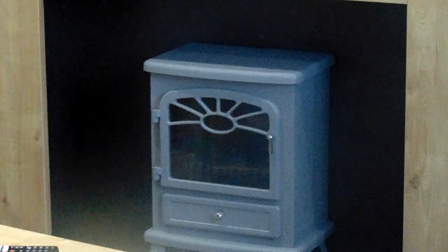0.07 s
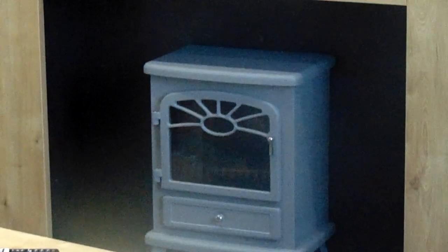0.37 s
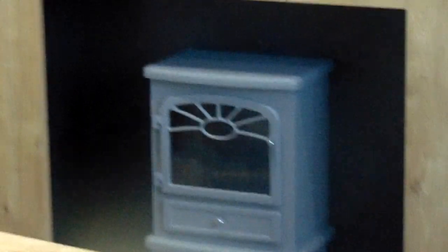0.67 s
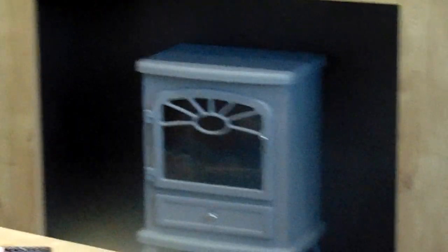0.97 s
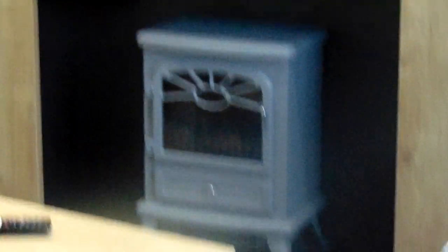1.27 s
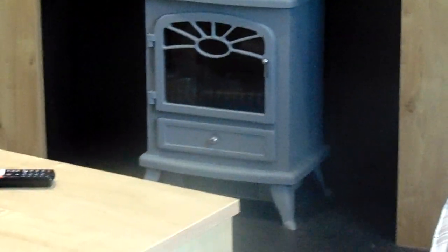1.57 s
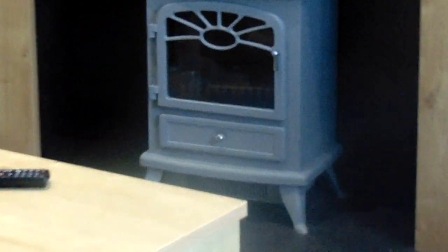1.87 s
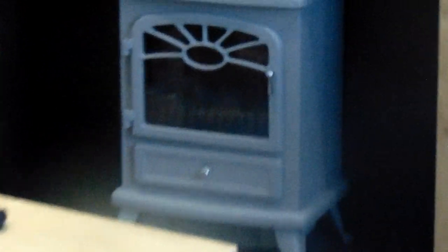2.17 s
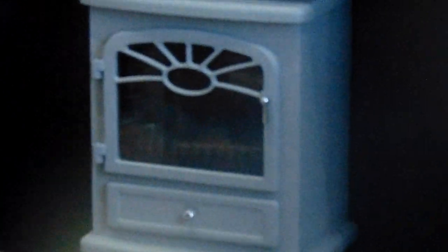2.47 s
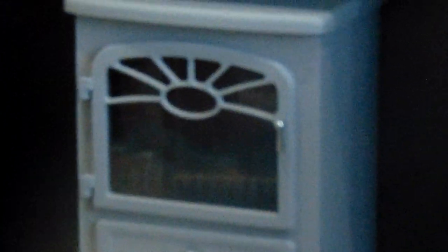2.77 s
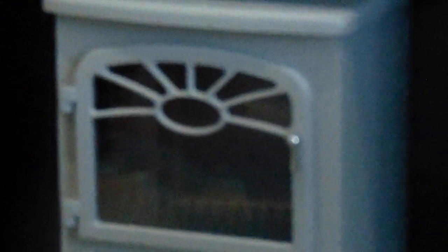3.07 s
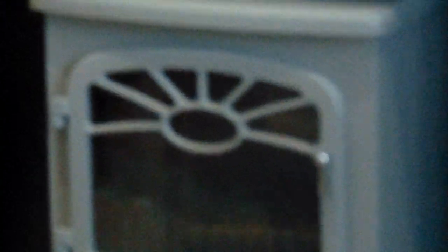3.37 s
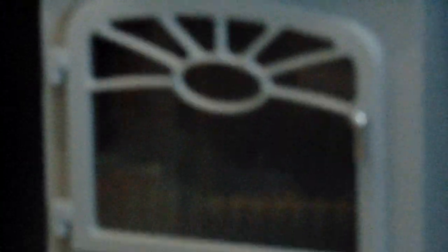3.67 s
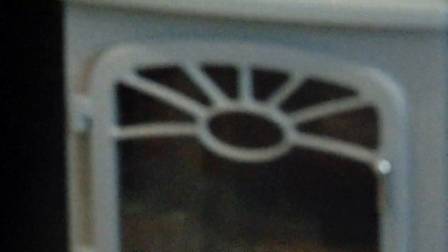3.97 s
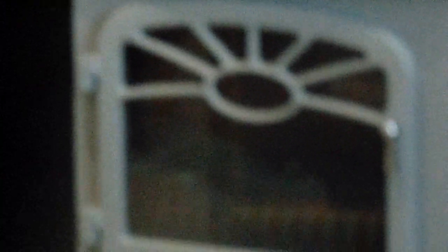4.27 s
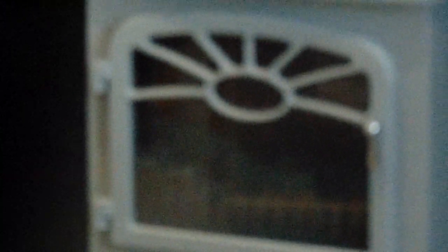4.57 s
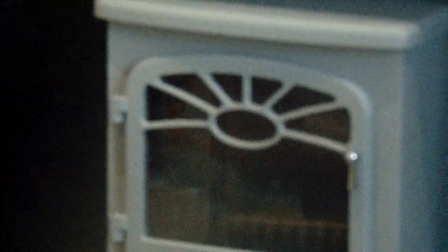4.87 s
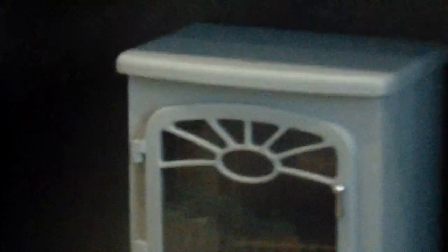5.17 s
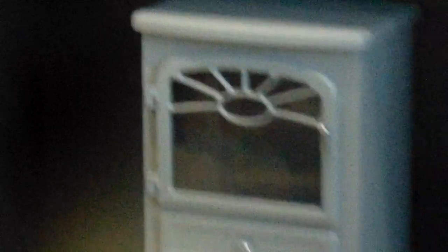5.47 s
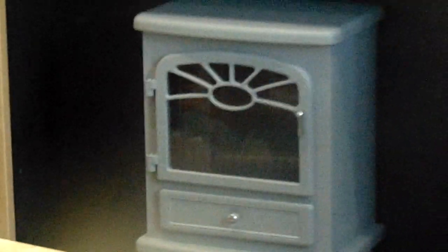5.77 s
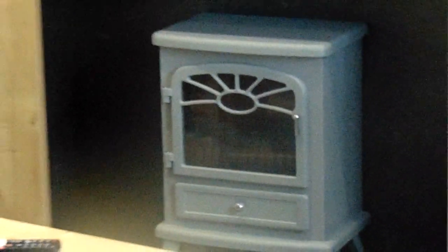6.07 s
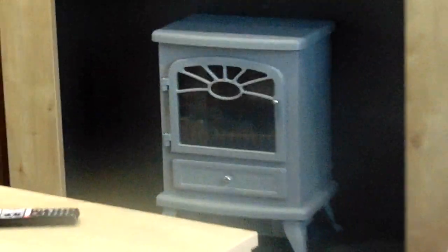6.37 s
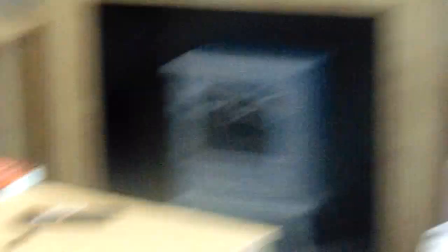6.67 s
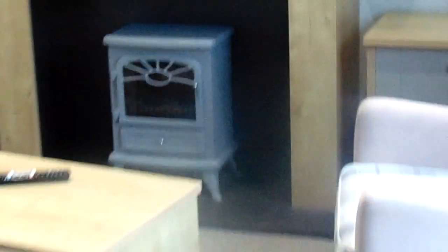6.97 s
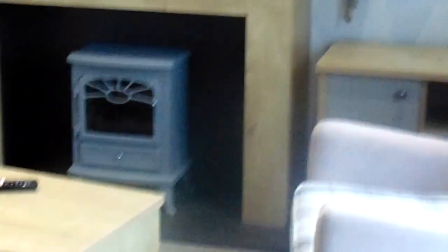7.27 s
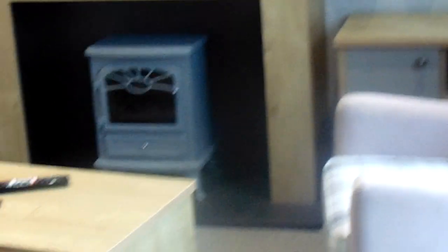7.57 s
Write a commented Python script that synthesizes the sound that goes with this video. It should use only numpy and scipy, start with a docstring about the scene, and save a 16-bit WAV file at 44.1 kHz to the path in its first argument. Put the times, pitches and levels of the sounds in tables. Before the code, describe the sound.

A small camera zoom motor whirrs faintly in and out with soft ticks, plastic handling clicks and one loud snap in a quiet room.

```python
"""A hand-held camera in a quiet room, heard through its own body.
The microphone comes on with mains hum and hiss, and fingers click the lever and the case.
The geared zoom motor whirrs in while the focus drive ticks softly, until one hard snap
of the lever overloads the microphone. The motor restarts with a brief scrape and whirrs back out
with more focus ticks, and near the end the fingers click, rub and squeak on the plastic."""
import sys
import numpy as np
from scipy import signal
from scipy.fft import rfft, irfft
from scipy.io import wavfile

SR = 44100
rng = np.random.default_rng(int(sys.argv[2]) if len(sys.argv) > 2 else 0)


def put_to_file(sound):
    """Save the sound as 16-bit audio at rate SR, in the file named by the first command-line argument."""
    columns = np.atleast_2d(sound).T  # one column per channel
    safe = np.clip(columns, -1, 1)
    whole_steps = np.round(safe * 32767)
    wavfile.write(sys.argv[1], SR, whole_steps.astype(np.int16))


N = 340011
TIME = np.arange(N) / SR

# How the motor runs, zooming in and then out: time_s, level_db, turns_per_s
MOTOR_IN = [(1.82, -72, 140), (1.88, -55.5, 140), (1.93, -50, 158.5), (2.3, -51.5, 162),
            (2.8, -51.5, 164.5), (3.2, -52, 159), (3.55, -53.5, 159.5), (3.81, -57.5, 153),
            (3.85, -79, 160)]
MOTOR_OUT = [(4.39, -74, 150.7), (4.46, -55.5, 158.8), (4.6, -59, 161.3), (5.25, -56.5, 160.8),
             (6.55, -55.5, 159.7), (6.95, -52.5, 156.7), (7.2, -57, 159.3), (7.46, -73, 151)]
# Pitches the lens barrel brings out of the gear noise: pitch_hz, width_hz, zoom_in_db, zoom_out_db
BARREL_BANDS = [(324, 190, -1, 0.5), (568.5, 91, -4.5, 2), (827, 89, -5, -5), (1200, 180, -0.5, 2),
                (1650, 220, -2, -1.5), (2136, 100, 0.5, 1), (2330, 100, -2, 1.5), (2646, 84, 1, 0),
                (2794, 120, -5, -0.5), (3078, 108.3, -5.5, -19), (3300, 150, -18.5, -3.5),
                (3745, 240, 4, -3), (5800, 1300, -10, -9.5), (7595, 230, -2, -4), (8095, 300, 0, -5),
                (9380, 510, -10, -5), (11000, 250, -14, -10), (12300, 780, -13, -11.5)]

def zoom_motor(run, bands_db, throb, grit_db, floor_db):
    """Gear teeth rub in bursts, once each motor turn, and the hollow barrel colours the noise."""
    time_s, level_db, speed = np.transpose(run)
    turns = np.cumsum(np.interp(TIME, time_s, speed) * (1 + 0.017 * drift(25))) / SR
    roughness = gain_of(.6 * drift(35) + grit_db * drift(500))
    bursts = 1 + throb * np.cos(2 * np.pi * turns)
    teeth = bursts * roughness * rng.standard_normal(N)
    hz = np.fft.rfftfreq(N, 1 / SR)
    power = gain_of(floor_db) ** 2 / (1 + (hz / 9000) ** 2)  # fills in between the bands
    for (pitch_hz, width_hz, *_), band_db in zip(BARREL_BANDS, bands_db):
        power += gain_of(band_db) ** 2 * np.exp(-((hz - pitch_hz) / width_hz) ** 2)
    whirr = irfft(rfft(teeth) * np.sqrt(power), N)
    return level(time_s, level_db) * unit_rms(whirr)


# Gear notes, with levels relative to the motor: cycles_per_turn, width_hz, zoom_in_db, zoom_out_db
GEAR_NOTES = [(14.23, 60, -9, -12.5), (17.02, 83, -23.5, -10.5), (58.83, 320, -6, -21)]

def gear_whine(run, notes_db, growth_db_per_s):
    """Each pair of gears sings at a multiple of the motor's speed and follows its level."""
    time_s, level_db, speed = np.transpose(run)
    turns_per_s = np.interp(TIME, time_s, speed)
    notes = sum(gain_of(db) * whine(multiple * turns_per_s, width_hz)
                for (multiple, width_hz, *_), db in zip(GEAR_NOTES, notes_db))
    return level(time_s, level_db + growth_db_per_s * (time_s - time_s[0])) * notes


# Notes of the carriage that holds the lens: pitch_hz, level_db, ring_s (time to fade by 60 dB)
CARRIAGE_NOTES = [(380, -31, 0.019), (576, 4.5, 0.034), (709, 3.5, 0.021), (834, -2, 0.034),
                  (1265, -3.5, 0.019), (1700, -7, 0.016)]
# Runs of even steps, before boost_db: start_s, step_count, gap_s, first_db, last_db
FOCUS_STEPS = [(1.954, 24, .0319, -45, -42), (2.738, 9, 0.041, -41, -42.5), (3.125, 6, .0642, -40, -42.5),
               (5.313, 11, .0423, -52, -45.5), (5.93, 5, .0423, -52.5, -46)]
# The carriage jolts as it takes up slack, before boost_db: start_s, strength_db
FOCUS_JOLTS = [(1.841, -40.5), (3.707, -43.5), (3.919, -45.5), (4.272, -46.5), (4.333, -44), (4.419, -41.5),
               (4.516, -43), (4.673, -45), (4.855, -44), (5.603, -41.5), (5.738, -48.5), (7.572, -43)]

def focus_drive(boost_db=4, uneven_db=0.8):
    """The focus lens moves in steps; each step or jolt softly knocks its carriage."""
    out, t = np.zeros(N), np.arange(3000) / SR
    for start_s, step_count, gap_s, first_db, last_db in FOCUS_STEPS:
        for k, db in enumerate(np.linspace(first_db, last_db, round(step_count))):
            knock = ring(CARRIAGE_NOTES, t, rise_cycles=1.1, scatter=.025)
            step_db = db + boost_db + uneven_db * rng.standard_normal()
            add(out, start_s + k * gap_s, gain_of(step_db) * knock)
    jolt_tone_db = favour(CARRIAGE_NOTES, pitch_hz=870, octave_drop_db=15)
    for start_s, db in FOCUS_JOLTS:
        knock = ring(CARRIAGE_NOTES, t, rise_cycles=1.1, scatter=.025, weight_db=jolt_tone_db)
        add(out, start_s, gain_of(db + boost_db) * knock)
    return out


SNAP_S = 3.6303
# Notes of the struck lever: pitch_hz, level_db, ring_s
LEVER_NOTES = [(1415, -8.5, 0.019), (2777, 1, .019), (3027, -6.5, 0.015), (3379, -10.5, .018),
               (3717, -12, 0.028), (4570, -12.5, .015), (5370, -14.5, .016), (7550, -12.5, 0.013)]

def lever_snap(snap_db=2, ring_db=8.5, bounce_s=.0034, bounce_shrink=.55, bounce_loss_db=1.5):
    """The lever slips off its catch, rings, and bounces on its stop, sooner and weaker each time."""
    out, hit_s = np.zeros(N), SNAP_S
    contact = dict(pitch_hz=2100, crack_db=0.5, thud_db=-31.5)
    add(out, hit_s - .0011, strike(snap_db - 11, **contact))  # the catch lets go
    add(out, hit_s, gain_of(ring_db) * ring(LEVER_NOTES, np.arange(4096) / SR, rise_cycles=2.36))
    for k in range(3):
        add(out, hit_s, strike(snap_db - k * bounce_loss_db, **contact))
        hit_s += bounce_s * bounce_shrink ** k
    return out


# Plastic parts click twice: start_s, level_db, pitch_hz, crack_db, gap_s, second_change_db
DOUBLE_CLICKS = [(1.1571, -35.5, 2600, -11, 0.0077, 7.5), (1.182, -28, 2200, -14, 0.0037, -5),
                 (1.1889, -16.5, 1620, -7, .0028, -2.5), (1.2055, -31, 1750, -7, 0.00335, 10.5),
                 (1.318, -20, 2150, -19.5, 0.0088, -3.5), (1.4288, -33.5, 2780, -15, 0.016, 5.5),
                 (3.856, -28, 2380, -10, 0.00103, -9), (6.6487, -18, 3540, -4, 0.0018, -1.5),
                 (6.658, -15, 2260, 5, .009, -17), (6.802, -27, 3220, 3.5, .0076, 8)]
# Fingertip knocks, and two sharper ticks of the focus drive at 5.6 and 5.74 s:
# start_s, level_db, pitch_hz, crack_db
CASE_KNOCKS = [(.289, -42, 2480, -20), (1.102, -38.5, 995, -9), (1.8367, -36, 4900, -10),
               (3.4976, -31.5, 1520, -0.5), (4.517, -37, 1292, -17), (5.6021, -38.5, 1700, 2),
               (5.7361, -39.5, 1290, -15), (6.6596, -20.5, 1370, 9.5), (6.731, -35.5, 1680, -8),
               (6.753, -27, 1660, 8.5), (6.774, -29.5, 1350, -1), (6.782, -31, 3250, -6)]
# The case creaks in faint ticks as the grip shifts: start_s, level_db
GRIP_CREAKS = [(6.828, -36), (6.858, -39), (6.994, -42), (7.082, -42), (7.43, -44), (7.516, -43)]

def clicks(click_thud_db=-42, knock_thud_db=-16.5):
    """Small hits ring the case; hard clicks barely push the microphone, knocks push it more."""
    out = np.zeros(N)
    for start_s, db, pitch_hz, crack_db, gap_s, second_change_db in DOUBLE_CLICKS:
        add(out, start_s, strike(db, pitch_hz, crack_db, click_thud_db))
        add(out, start_s + gap_s, strike(db + second_change_db, pitch_hz, crack_db, click_thud_db))
    for start_s, db, pitch_hz, crack_db in CASE_KNOCKS:
        add(out, start_s, strike(db, pitch_hz, crack_db, knock_thud_db))
    for start_s, db in GRIP_CREAKS:
        add(out, start_s, strike(db, pitch_hz=2660, crack_db=-14, thud_db=click_thud_db))
    return out


# Notes of the plastic case: pitch_hz, level_db, ring_s
CASE_NOTES = [(775, -1, 0.021), (910, -7.5, 0.013), (1184, 0.5, 0.019), (1462, 0, 0.016), (1729, 1.5, .015),
              (1906, -7.5, 0.011), (2052, 0, 0.016), (2217, -3.5, .014), (2435, -3, 0.012),
              (2802, 3, 0.0087), (2968, 3, 0.014), (3515, -6, 0.0083), (3938, -8, 0.0073),
              (3960, -5, 0.01605), (4720, -10.5, 0.014), (5456, -9, .009)]
# Tone of a hit's bright crack and of its low rumble: pitch_hz, level_db
CRACK_TONE = [(300, -9.5), (1000, -2), (4200, 5), (6000, -8), (8000, -1.5), (10000, -1.5), (12700, 4),
              (14500, -3)]
RUMBLE_TONE = [(60, -9.5), (160, 1.5), (450, -4), (900, -1), (1500, -22), (5000, -51)]

def strike(level_db, pitch_hz, crack_db, thud_db, push_s=0.0012):
    """One hit rings the case; a crack and a thud on the microphone are set relative to that ring."""
    t = np.arange(4096) / SR
    # where and how hard the hit lands brings out the notes near one pitch
    tone_db = favour(CASE_NOTES, pitch_hz, octave_drop_db=12)
    body = ring(CASE_NOTES, t, rise_cycles=1.2, scatter=.012, weight_db=tone_db)
    crack = 0.84 * noise(CRACK_TONE, len(t)) * (1 - np.exp(-t / 0.00026)) * np.exp(-t / 0.0012)
    push = -t / push_s * np.exp(1 - t / push_s)
    rumble = noise(RUMBLE_TONE, len(t)) * (1 - np.exp(-t / 0.00038)) * np.exp(-t / 0.0075)
    thud = push + gain_of(-7) * rumble
    return gain_of(level_db) * (body + gain_of(crack_db) * crack + gain_of(thud_db) * thud)


# Notes of the spring and of a button's metal dome: pitch_hz, level_db, ring_s
SPRING_NOTES = [(1326, -7.5, 0.12), (1933, 4, .09), (2406, -10.5, 0.125), (2620, -8.5, 0.083),
                (3895, -20.5, .45), (5260, -21, 0.093)]
DOME_NOTES = [(3960, 0, 0.019)]

def springs(spring_db=-18.5, dome_s=1.208, dome_db=-25):
    """A spring rings on after the lever's snap; earlier, a button's dome pings as it pops back."""
    out, t = np.zeros(N), np.arange(16384) / SR
    add(out, SNAP_S, gain_of(spring_db) * ring(SPRING_NOTES, t, rise_cycles=3))
    add(out, dome_s, gain_of(dome_db) * ring(DOME_NOTES, t, rise_cycles=2))
    return out


# A brief scrape as the zoom motor starts again, then finger rubs: start_s, length_s, level_db
RUB_STROKES = [(4.442, 0.064, -53.5), (6.761, 0.033, -41), (6.877, 0.025, -44), (7.072, .25, -50),
               (7.251, 0.25, -50), (7.315, 0.022, -52)]
# Tone of the rubbing: pitch_hz, level_db
RUB_TONE = [(200, -3), (1200, 0), (3000, -1), (5000, -6), (9000, -6), (12000, -6), (13700, -2), (15000, 0)]
# One finger rub squeaks, rising in pitch: time_s, pitch_hz, level_db
FINGER_SQUEAK = [(7.14, 1810, -69), (7.2, 1890, -57), (7.3, 2500, -63), (7.34, 3060, -67),
                 (7.39, 3100, -78)]

def rubbing():
    """The restarting motor scrapes; later a finger drags on the case in fine slips and squeaks once."""
    strokes = np.zeros(N)
    for start_s, length_s, db in RUB_STROKES:
        progress = np.clip((TIME - start_s) / length_s, 0, 1)
        strokes += gain_of(db) * abs(np.sin(np.pi * progress)) ** 0.94  # swells, then fades
    slips = unit_rms(noise(RUB_TONE) * gain_of(1.8 * drift(370)))
    time_s, pitch_hz, level_db = np.transpose(FINGER_SQUEAK)
    squeak = level(time_s, level_db) * whine(np.interp(TIME, time_s, pitch_hz), width_hz=200)
    return strokes * slips + squeak


# Tone of the echo: pitch_hz, level_db
ECHO_TONE = [(100, 1), (1000, -2), (3000, -4), (5500, 6.0), (14000, -0.5)]

def room_echo(sound, ring_s=0.15, echo_db=-33):
    """The furnished room sends back a faint, short echo."""
    t = np.arange(16384) / SR
    tail = noise(ECHO_TONE, len(t)) * gain_of(-60 * t / ring_s) * (t > .006)
    return gain_of(echo_db) * signal.fftconvolve(sound, tail / np.linalg.norm(tail))[:N]


# How loud the room air and the hiss are: time_s, air_db, hiss_db
BACKGROUND_LEVELS = [(0, -56.5, -57.5), (.7, -58, -56), (3.6, -59, -54), (3.75, -58, -61),
                     (4.4, -60.5, -61), (7.35, -57, -63), (7.55, -55.5, -58), (7.75, -54, -58.5)]
# Tone of the air and of the hiss: pitch_hz, level_db
AIR_TONE = [(15, 5), (40, -3.5), (80, 2.5), (160, -2.5), (320, -2.5), (600, -5.5), (1200, -8.5),
            (2000, -14), (4000, -21.5), (9000, -40)]
HISS_TONE = [(100, 2.5), (2000, 3), (4000, 0.5), (8000, -1), (14000, -3)]

def background(switch_on_s=0.07, hum_hz=99.7, hum_db=-58.5):
    """The microphone comes on and settles, with room air, wavering mains hum and its own hiss."""
    time_s, air_db, hiss_db = np.transpose(BACKGROUND_LEVELS)
    hum = np.sqrt(2) * np.sin(2 * np.pi * hum_hz * TIME + .12 * drift(3))
    hum *= gain_of(hum_db + 0.94 * drift(6.5))
    air = level(time_s, air_db) * noise(AIR_TONE)
    hiss = level(time_s, hiss_db) * noise(HISS_TONE)
    settling = -0.0069 * np.exp(-abs(TIME - switch_on_s) / 0.098)
    return (TIME > switch_on_s) * (air + hiss + hum + settling)


def ring(notes, t, rise_cycles, scatter=0, weight_db=0):
    """A struck part's notes swell, low ones more slowly, and fade; scatter detunes each hit a bit."""
    hz, db, ring_s = np.transpose(notes)[:, :, None]
    detune, phase = rng.uniform(-1.17, 1, (2, len(notes), 1))
    swell = 1 - np.exp(-(t * hz / rise_cycles) ** 2)
    waves = np.sin(2 * np.pi * hz * (1 + scatter * detune) * t + np.pi * phase)
    sound = (gain_of(db + weight_db - 60 * t / ring_s) * swell * waves).sum(0)
    return sound / np.sqrt(np.sum(sound ** 2) / (.0005 * SR))  # same energy for every ring


def favour(notes, pitch_hz, octave_drop_db):
    """Decibels that turn each note down the further it lies from one pitch."""
    return -octave_drop_db * np.log2(np.array(notes)[:, :1] / pitch_hz) ** 2


def whine(pitch_hz, width_hz):
    """A tone that follows a pitch curve, made hoarse by uneven contact."""
    angle = 2 * np.pi * np.cumsum(pitch_hz) / SR
    smear = np.exp(-(np.fft.rfftfreq(N, 1 / SR) / width_hz) ** 2 / 2)
    cos_part, sin_part = irfft(rfft(rng.standard_normal((2, N))) * smear, N)
    return unit_rms(cos_part * np.cos(angle) + sin_part * np.sin(angle))


def noise(tone, size=N):
    """Noise shaped by a table of pitch_hz, level_db."""
    hz, db = np.transpose(tone)
    shape_db = np.interp(np.log(np.fft.rfftfreq(size, 1 / SR) + 1), np.log(hz), db)
    return unit_rms(irfft(rfft(rng.standard_normal(size)) * gain_of(shape_db), size))


def drift(changes_per_s):
    """A random wander with a typical size of 1."""
    points = rng.standard_normal(16384)
    return unit_rms(np.interp(TIME * changes_per_s, np.arange(len(points)), points))


def level(time_s, level_db):
    """Gain along a level curve, silent outside it."""
    return gain_of(np.interp(TIME, time_s, level_db, left=-140, right=-140))


def gain_of(db):
    """Turns decibels into a multiplier."""
    return 10 ** (np.asarray(db) / 20)


def unit_rms(x):
    """Scales a signal so its average strength (rms) is 1."""
    return x / np.sqrt(np.mean(x ** 2) + 1e-20)


def add(mix, start_s, sound):
    """Mixes a sound in at its start time."""
    part = mix[round(start_s * SR):][:len(sound)]
    part += sound[:len(part)]


def scene():
    """Everything that reaches the one microphone."""
    _, _, bands_in_db, bands_out_db = np.transpose(BARREL_BANDS)
    motor = zoom_motor(MOTOR_IN, bands_in_db, throb=0.21, grit_db=1.35, floor_db=-13.5)
    motor += zoom_motor(MOTOR_OUT, bands_out_db, throb=0.16, grit_db=1.8, floor_db=-9.5)
    _, _, notes_in_db, notes_out_db = np.transpose(GEAR_NOTES)
    gears = gear_whine(MOTOR_IN, notes_in_db, growth_db_per_s=0)
    gears += gear_whine(MOTOR_OUT, notes_out_db, growth_db_per_s=2)  # louder as the barrel draws in
    hits = clicks() + lever_snap() + springs()
    mix = motor + gears + focus_drive() + hits + room_echo(hits) + rubbing() + background()
    return mix[None]


def record(dry):
    """The microphone clips whatever is too loud, then the highest treble is cut away."""
    treble_cut = signal.firwin(511, cutoff=14200, window=("kaiser", 9), fs=SR)
    return signal.oaconvolve(np.clip(dry, -1, 1), treble_cut[None], "same")


dry = scene()
out = record(dry)
put_to_file(out)
```